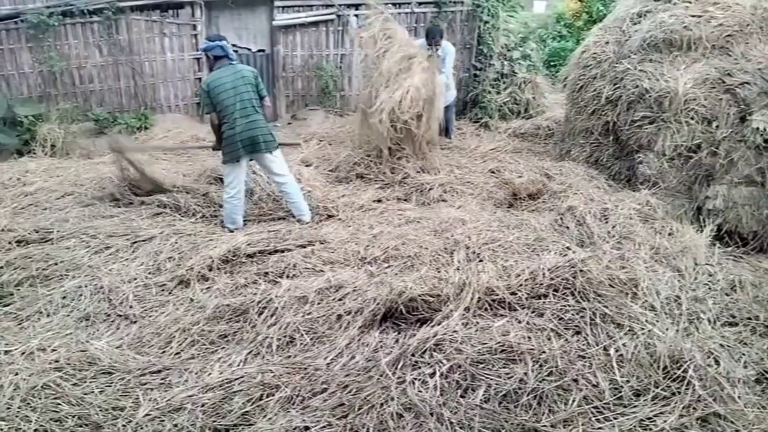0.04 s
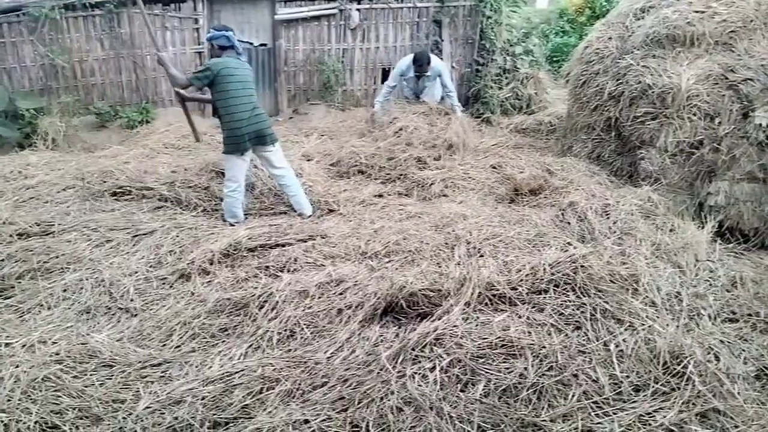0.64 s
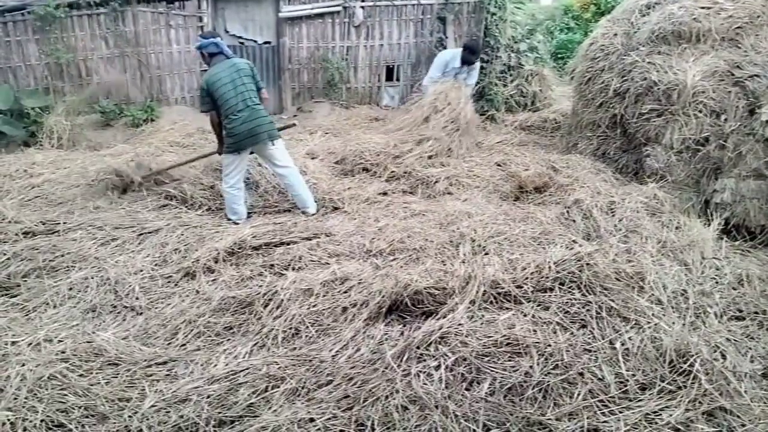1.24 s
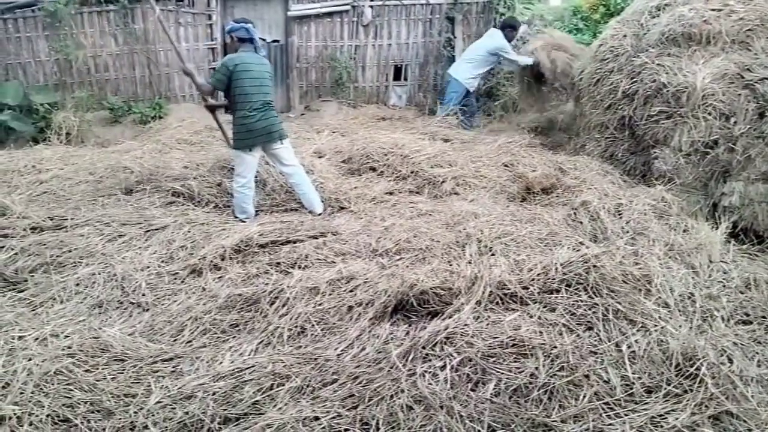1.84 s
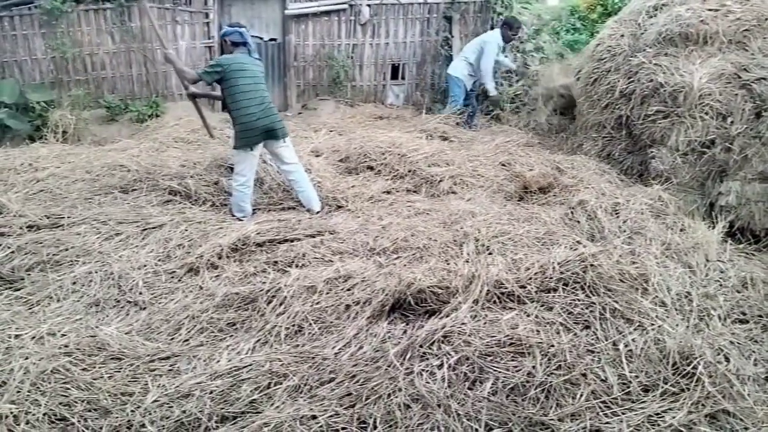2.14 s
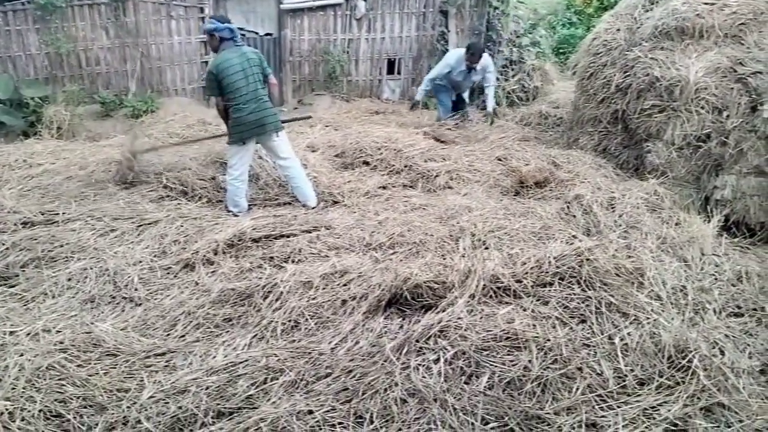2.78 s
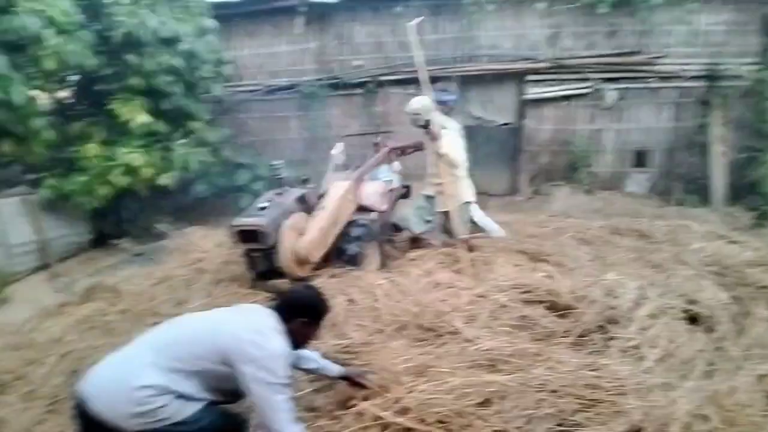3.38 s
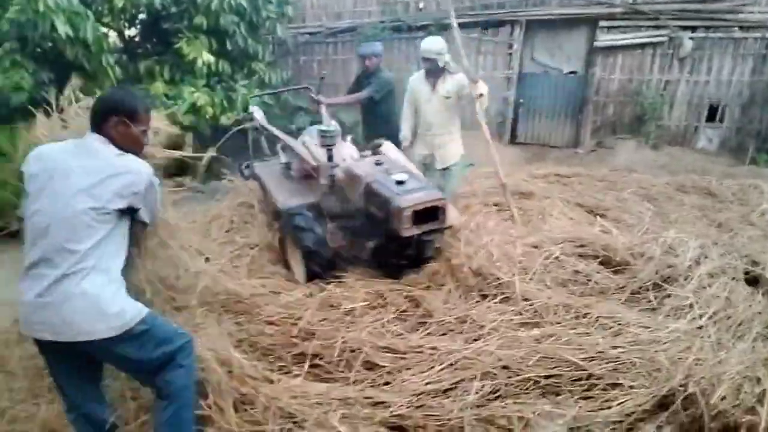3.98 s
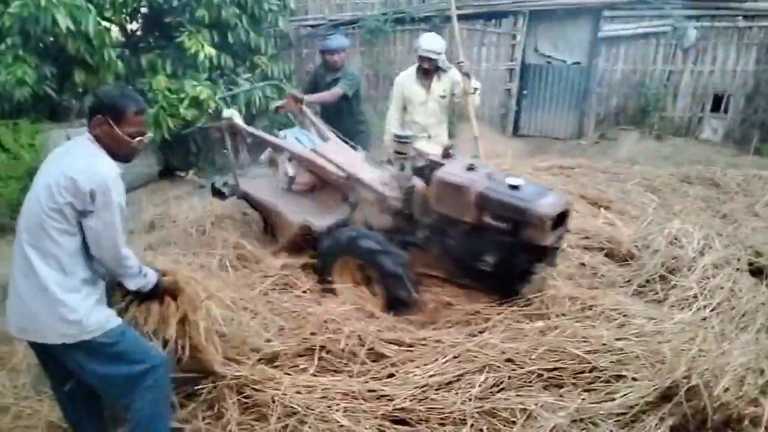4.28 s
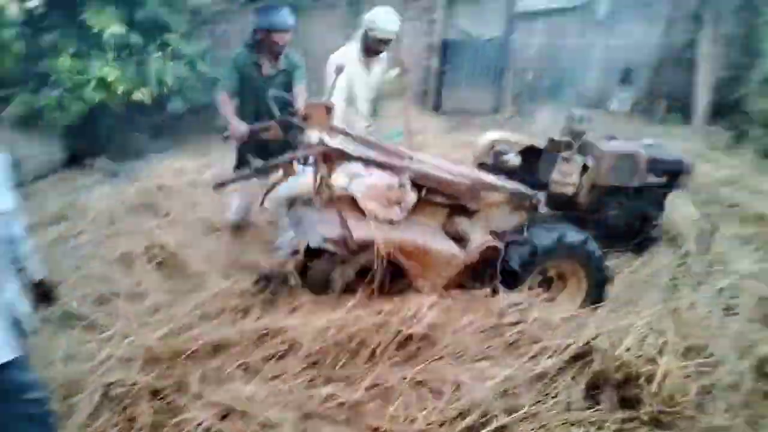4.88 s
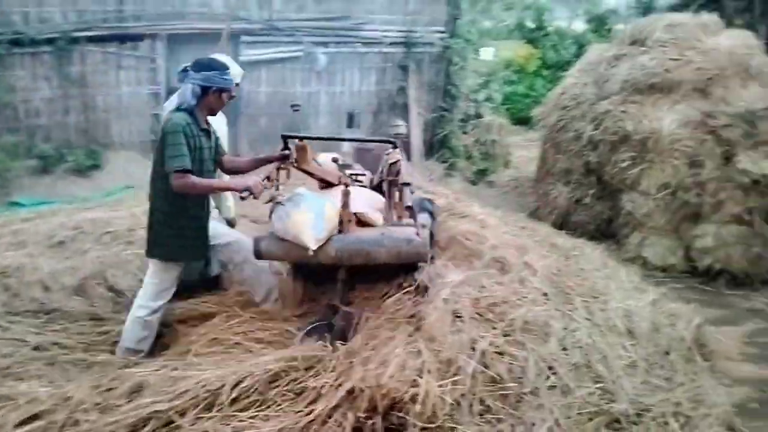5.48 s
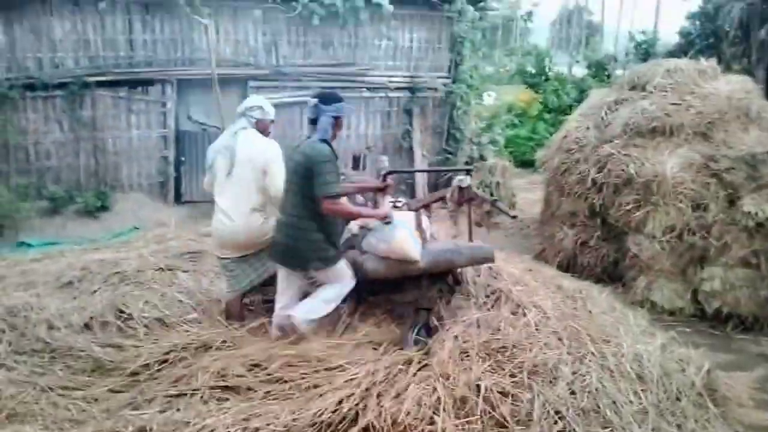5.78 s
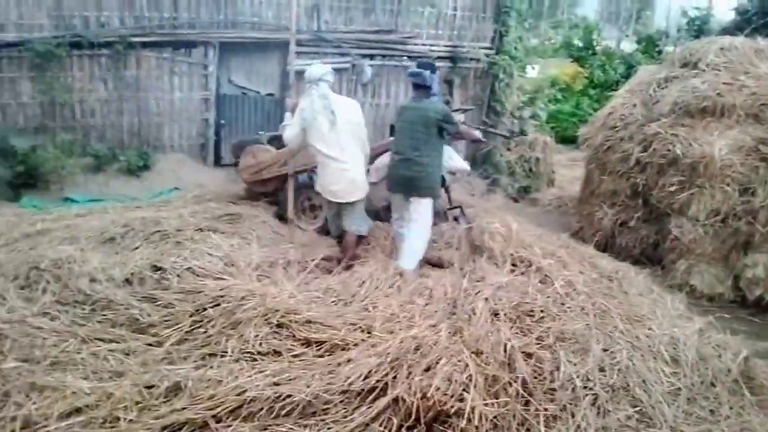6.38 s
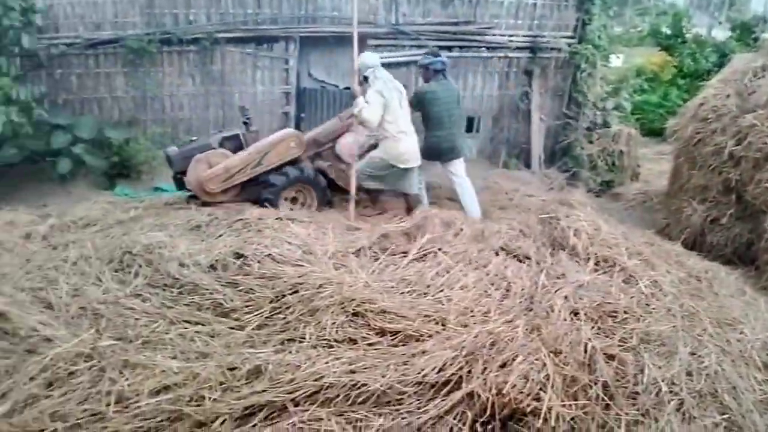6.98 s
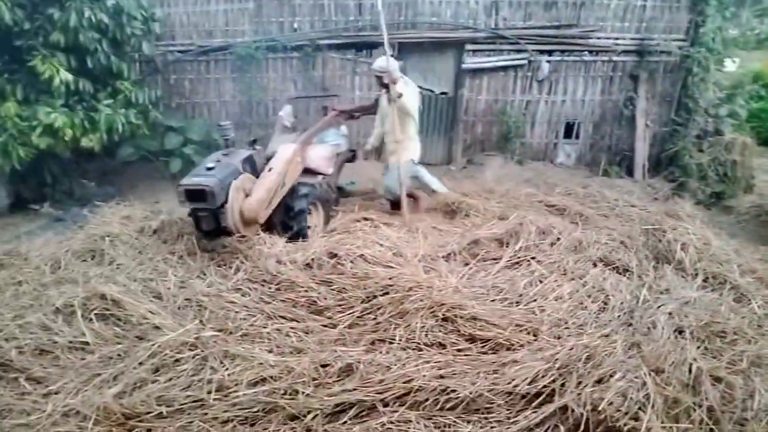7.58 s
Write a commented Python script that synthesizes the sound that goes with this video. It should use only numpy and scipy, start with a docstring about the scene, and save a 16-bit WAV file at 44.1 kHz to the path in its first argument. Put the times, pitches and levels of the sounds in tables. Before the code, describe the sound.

Soft crunching knocks and rustling straw, a few microphone bumps, a brief silence, then a small two-wheel diesel tractor chugs and rattles under load.

```python
"""A single-cylinder diesel walking tractor drives past over rice straw: its exhaust thumps about twenty
times a second through the silencer, under the clatter of its block, sheet-metal covers and loose parts.
It cuts in after a moment of silence. Before that, in a quiet village yard, a pole beats the straw with
a crunch and a thud, fingers bump and rub the phone, stalks rustle and a faint whine wavers far off."""
import sys
import numpy as np
from scipy import signal
from scipy.fft import rfft, irfft, next_fast_len
from scipy.io import wavfile
from scipy.ndimage import map_coordinates

SR = 44100
rng = np.random.default_rng(int(sys.argv[2]) if len(sys.argv) > 2 else 0)


def wav_record(signal):
    """Record a signal, one row per channel, as 16-bit PCM in the file named by sys.argv[1]."""
    frames = np.transpose(np.atleast_2d(signal))
    bounded = np.clip(frames, -1, 1)
    # unit amplitude maps onto the largest positive 16-bit level
    quanta = np.round(bounded * 32767).astype(np.int16)
    wavfile.write(sys.argv[1], SR, quanta)


N = 341334

# engine tempo: (time [s], firing rate [Hz])
FIRING_RATE = [(3.85, 20.3), (4.13, 20.2), (4.41, 20.7), (4.68, 19.8), (4.96, 19.7), (5.24, 20.2),
               (5.8, 20.3), (6.07, 20.5), (6.35, 20.9), (6.63, 20.8), (6.91, 21.5), (7.18, 21.7),
               (7.46, 22.1), (7.74, 21.5)]
# how hard the engine pulls: (time [s], exhaust level [dB])
ENGINE_LOAD = [(3.87, -23.5), (4.35, -25), (5.0, -27), (5.7, -25), (6.05, -22.5), (6.8, -25), (7.74, -23.5)]
# the hardest firings: (time [s], accent [dB])
ACCENTS = [(4.03, 3.5), (6.52, 3.5), (6.74, 5), (6.97, 5), (7.25, 4.5)]
# the drive-by, heading 0 head-on and 180 tail-on:
# (time [s], distance [m], heading [deg], left lag [s], covers' pan to the left [dB])
DRIVE_BY = [(3.85, 4.84, 5, -.00004, -2.5), (4.3, 3.8, 49, .00003, -2), (4.75, 3.65, 44, .00015, -3),
            (5.15, 3.4, 146, .00012, -2.5), (5.9, 4.55, 150, -.00003, -5), (6.6, 4.48, 113, -.00008, -4.5),
            (7.1, 4.2, 127, -.0001, -3.5), (7.74, 4.33, 65, -.00012, -6.5)]
# resonances of the tractor's bodies: (frequency [Hz], bandwidth [Hz], relative level [dB])
SILENCER_MODES = [(59.6, 54, -6), (97, 25.8, 2.5), (120.3, 30.4, -3.5), (230, 69, -10)]
BLOCK_FRONT_MODES = [(218, 51, -13.5), (367, 35, -6), (444, 44, 1.5), (584, 180, -7.5)]
BLOCK_REAR_MODES = [(240, 73, -9.5), (345.5, 29, -4), (407.4, 21.8, 2), (477, 56, -5), (590, 50, -5.5)]
COVER_MODES = [(690, 124, -9.5), (868, 69, 1.5), (1085, 250, -5.5), (1200, 117, -2.5)]
# chassis clanks that lift the rattle and hiss: (time [s], relative strength [dB])
CHASSIS_CLANKS = [(3.874, -7), (4.0228, -5.5), (4.1071, -7), (4.453, -16), (4.667, -7), (5.3476, -6),
                  (5.5563, -10), (5.8636, -6), (6.056, -7), (6.733, -6.5)]
# mix at REFERENCE_M: (base level [dB], front boost [dB], side boost [dB], dip behind the drivers [dB])
BLOCK_MIX = (-23, 4.5, -0.5, 1)
COVERS_MIX = (-17, -1, 2, 2.5)
RATTLE_MIX = (-22, 2.5, -0.5, 5)
HISS_MIX = (-23.5, -0.5, 0, 3)
# pole hits on the straw: (time [s], relative crunch [dB], relative thud [dB])
POLE_HITS = [(-.05, -21.5, -26), (1.278, -25.5, -23), (2.715, -25, -25.5)]
# finger bumps: (time [s], level [dB], pitch [Hz], decay [cycles], click [dB], left trim [dB])
FINGER_BUMPS = [(0.317, -35, 215, 16, -63, -3), (3.328, -24.5, 122, 4.1, -59, -32),
                (3.412, -23, 134, 4, -56, -33), (3.53, -23, 69.6, 4.8, -25, -34)]
# armfuls of straw gathered or thrown: (peak time [s], half length [s], level [dB])
STRAW_ARMFULS = [(0.556, 0.31, -48), (1.733, 0.31, -47.5)]
# armfuls landing softly: (time [s], level [dB])
STRAW_LANDINGS = [(.4, -64), (1.62, -52.5)]
# glide of the far whine: (time [s], pitch [Hz])
WHINE_PITCH = [(0, 974), (.55, 834), (1.0, 795), (1.2, 933), (1.5, 933), (1.95, 840), (2.4, 986),
               (2.9, 845), (3.3, 970)]
# tone colour of each noise layer: (frequency [Hz], relative level [dB])
RATTLE_EQ = [(900, -32), (1400, 1.5), (1800, -2), (2250, 2), (2900, -4.5), (3500, -3.5), (4100, -14.5),
             (6000, -41)]
HISS_EQ = [(2800, -9.5), (4100, -3.5), (5300, 0), (6600, -5.5), (7500, -14), (8700, -18), (11000, -11),
           (13500, -17.5), (16000, -23)]
CRUNCH_EQ = [(88, -20), (150, -11), (303, -5.5), (465, -17.5), (850, -8.5), (1380, -16), (2340, -6.5),
             (2680, -14.5), (3330, -11.5), (9530, -23.5), (13000, -20.5), (15800, -18.5)]
RUB_EQ = [(700, -30), (1000, -6), (1200, -12), (1450, 0), (1700, -13), (2200, -7), (4000, -32)]
STRAW_EQ = [(710, -10), (1200, -3.5), (1830, -4), (2130, -1.5), (2320, -4.5), (2940, -3.5), (6120, -7),
            (8460, -11.5), (15000, -7), (15800, -15)]
AIR_EQ = [(15, -36), (25, -15), (64, 1), (91, -9), (189, 0), (248, -7.5), (278, -3), (505, -11), (818, -8),
          (2500, -13.5), (3250, -30), (5500, -120)]
SWISH_EQ = [(1200, -14), (1900, -17), (2250, -2), (2700, -17.5), (5000, -34.5)]
GROUND_EQ = [(20, -22), (55, 3), (140, -8), (300, -10.5), (600, -14.5), (1500, -31)]
CLICK_EQ = [(100, 6), (500, 0), (1200, -1), (1800, -33), (8000, -36)]
LANDING_EQ = [(150, -40), (420, -2.5), (700, 1), (1100, -6), (4000, -39)]
# how alike the phone's two ports sound: (frequency [Hz], correlation [0-1])
TRACTOR_LIKENESS = [(100, .99), (400, 1), (620, 0.7), (850, 0.94), (1250, 0.57), (1750, 0.37), (2150, 0.91),
                    (3000, 0.35), (10000, 0.023)]
YARD_LIKENESS = [(100, 0.8), (700, 0.47), (2000, 0.049), (8000, 0.041)]
# shading by the phone's body: (frequency [Hz], left minus right [dB])
TRACTOR_PAN = [(250, 0), (450, -0.5), (620, 0.5), (1500, -1), (2200, 2.5), (3800, 0.5), (5300, -8),
               (6400, -15), (7300, -22), (8800, 0.5), (11000, 0.5), (13500, 5), (16000, 11)]
YARD_PAN = [(200, -2), (600, -4), (1200, -9), (2500, -0.5), (6000, 5), (12000, 8.5)]
# the tractor's phase between the ports: (frequency [Hz], left lead [rad])
TRACTOR_PHASE = [(500, 0), (900, .2), (1290, 1.2), (1640, 2.7), (1850, 5), (2200, 6.2)]

PAUSE_START_S, PAUSE_END_S, FIRST_FIRING_S = 3.583, 3.843, 3.869
REFERENCE_M = 4
SCREEN_S, SCREEN_WIDTH_S = 6.264, 0.23  # the two drivers walk between the engine and the phone
GRIP_START_S, GRIP_END_S, GRIP_LEFT_DB = 3.15, 3.435, -34
LEFT_RIGHT = np.array([[.5], [-.5]])  # splits a difference between the channels


def tractor():
    """The drive-by: exhaust thumps, while gear and valve impacts ring the block, covers and loose parts."""
    load_db, = curves(ENGINE_LOAD)
    distance, degrees, lag, pan_db = curves(DRIVE_BY)
    heading = np.radians(degrees)
    gain = lambda mix: pass_gain(mix, distance, heading)
    pulses, age = firings(load_db)
    jolts = wobble(70)  # the whole frame shakes unevenly
    knocking = engine_block(age, jolts, heading)
    rattle, hiss = loose_parts(age, jolts, heading)
    sound = amp(load_db) * exhaust(pulses, age) + gain(BLOCK_MIX) * knocking
    sound += gain(COVERS_MIX) * amp(pan_db * LEFT_RIGHT) * covers(age, jolts)
    sound += gain(RATTLE_MIX) * rattle + gain(HISS_MIX) * hiss
    delayed = np.arange(N) - LEFT_RIGHT * lag * SR  # the lag follows the tractor's bearing
    return np.array([map_coordinates(side, [at], order=5) for side, at in zip(sound, delayed)])


def firings(load_db):
    """One impulse per firing, more uneven under load, and the seconds since the last one."""
    rate, = curves(FIRING_RATE)
    cycles = np.cumsum(rate) / SR
    cycles += .025 * wobble(14) - cycles[round(FIRST_FIRING_S * SR)]
    at = np.flatnonzero(np.diff(np.floor(cycles)))
    spread_db = 1 + .2 * (load_db[at] - load_db.mean())
    size_db = spread_db * rng.uniform(-np.sqrt(3), np.sqrt(3), N)[at]
    for s, db in ACCENTS:
        size_db[np.argmin(np.abs(at / SR - s))] = db
    pulses = np.zeros(N)
    pulses[at] = amp(size_db)
    return pulses, cycles % 1 / rate


def exhaust(pulses, age):
    """The thump: each firing pushes a slug of gas and a turbulent puff through the silencer."""
    puff = unit(rng.standard_normal((2, N)) * (np.exp(-age / .011) + .3))
    slug = unit(np.roll(pulses, round(.003 * SR))) * np.array([[1], [0]])  # mid only, no side
    return tractor_image(ringing(slug + .9 * puff, SILENCER_MODES, low_hz=23, high_hz=305))


def engine_block(age, jolts, heading):
    """Knocks ring the block; its front and rear tones crossfade as the tractor turns."""
    drive = surge(age, depth=0.13, peak_s=0.021) * amp(0.26 * jolts)
    knocks = lambda: grains(rate=900, spread_db=3.5, noise=0.64) * drive
    front = ringing(knocks(), BLOCK_FRONT_MODES, low_hz=180, high_hz=730)
    rear = ringing(knocks(), BLOCK_REAR_MODES, low_hz=192, high_hz=800)
    return tractor_image(np.cos(heading / 2) * front + np.sin(heading / 2) * rear)


def covers(age, jolts, shift_db=0.73):
    """Taps ring the sheet metal; the ring shifts from panel to panel as the tractor rocks."""
    drive = surge(age, depth=0.089, peak_s=0.015) * amp(0.91 * jolts)
    taps = lambda: grains(rate=1100, spread_db=0.5, noise=0.52) * drive
    shares = [amp(db + shift_db * wobble(6)) * np.sqrt(width) for _, width, db in COVER_MODES]
    rings = [ringing(taps(), [(hz, width, 0)], low_hz=620, high_hz=1360) for hz, width, _ in COVER_MODES]
    blend = sum(share * ring for share, ring in zip(shares, rings))
    return tractor_image(blend / np.linalg.norm(shares, axis=0))


def loose_parts(age, jolts, heading):
    """The top end: small parts rattle, valves and belt hiss, and both flare at each chassis clank."""
    clanks = sum(amp(db + 10) * burst(s - .003, rise=0.0094, t60=0.027) for s, db in CHASSIS_CLANKS)
    flicker = unit(belt_slap(heading) * amp(jolts + 0.91 * wobble(260)))
    shaking = surge(age, depth=0.13, peak_s=0.0021) * flicker * np.sqrt(1 + clanks ** 2)
    rattle = coloured(grains(rate=2000, spread_db=-0.5, noise=0.9), RATTLE_EQ) * shaking
    hiss = coloured(grains(rate=3000, spread_db=3.0, noise=1.03), HISS_EQ) * shaking
    return tractor_image(rattle), tractor_image(hiss)


def belt_slap(heading, turns_per_firing=1.8, depth_db=1.5):
    """The drive belt pulses the clatter once a turn, deepest from the front."""
    rate, = curves(FIRING_RATE)
    turns = turns_per_firing * np.cumsum(rate) / SR
    return amp(depth_db * np.cos(heading / 2) ** 2 * np.cos(2 * np.pi * turns))


def surge(age, depth, peak_s):
    """Each firing shakes the engine harder for a moment."""
    return unit(1 + depth * (age / peak_s) * np.exp(1 - age / peak_s))


def pass_gain(mix, distance, heading):
    """A part's level falls with distance, depends on the side it shows and dips behind the drivers."""
    db, front_db, side_db, screen_db = mix
    facing_db = front_db * np.cos(heading / 2) ** 2 + side_db * np.sin(heading) ** 2
    return amp(db + facing_db - screen_db * swell(SCREEN_S, SCREEN_WIDTH_S)) * REFERENCE_M / distance


def pole_hits():
    """The pole swishes through the air, crushes dry stalks and thuds into the packed layer below."""
    stalks = coloured(yard_image(grains(rate=3500, spread_db=3.5, noise=1.0)), CRUNCH_EQ)
    swish = yard_noise(SWISH_EQ)
    ground = coloured(rng.standard_normal(N), GROUND_EQ)
    out = np.zeros((2, N))
    for s, crunch_db, thud_db in POLE_HITS:
        crush = burst(s - .004, rise=.018, t60=.18) + .08 * burst(s - .03, rise=.05, t60=.5)
        low_tone = np.sin(2 * np.pi * 100 * (clock() - s - .028))
        out += amp(crunch_db - 33.5) * swish * swell(s - .017, width=0.12)
        out += amp(crunch_db) * stalks * crush
        out += amp(thud_db - 0.5) * low_tone * burst(s + 0.032, rise=0.00526, t60=0.083)
        out += amp(thud_db - 6.5) * ground * burst(s + 0.0071, rise=0.015, t60=0.26)
    return out


def finger_bumps():
    """Each touch gives the phone a short low swing and a dull click, mostly on the right."""
    click = coloured(rng.standard_normal(N), CLICK_EQ)
    out = np.zeros((2, N))
    for s, db, hz, cycles, click_db, left_db in FINGER_BUMPS + grip_slips(count=11):
        decay = cycles / hz
        swing = -amp(db) * burst(s, rise=decay / 8, t60=decay) * np.sin(2 * np.pi * hz * (clock() - s))
        tick = amp(click_db) * click * burst(s, rise=0.00055, t60=0.018)
        out += (swing + tick) * amp([[left_db], [0]])
    return out


def grip_slips(count, cycles=3.8, click_db=-18):
    """The grip shifts in small uneven slips, growing firmer and lower; rows as in FINGER_BUMPS."""
    timing, force, tuning = rng.standard_normal((count, 3)).T
    elapsed = np.linspace(0, GRIP_END_S - GRIP_START_S, count) + 0.0048 * timing
    levels_db = -32 + 26 * elapsed + force
    pitches_hz = (142 - 230 * elapsed) * np.exp(0.16 * tuning)
    return [(GRIP_START_S + s, db, hz, cycles, db + click_db, GRIP_LEFT_DB)
            for s, db, hz in zip(elapsed, levels_db, pitches_hz)]


def finger_rub():
    """Skin slides faintly over the case beside the right port while the grip shifts."""
    friction = coloured(rng.standard_normal(N), RUB_EQ)
    return amp(-54) * swell(3.42, width=0.22) * friction * amp([[GRIP_LEFT_DB], [0]])


def loose_straw(underfoot_db=-53.5, stir_db=-49.5):
    """Straw rustles underfoot, swells around each hit and armful, and lands softly when tossed."""
    stirs = [amp(stir_db) * swell(s, width=0.26) for s, _, _ in POLE_HITS]
    armfuls = [amp(db) * swell(s, width) for s, width, db in STRAW_ARMFULS]
    handling = np.sqrt(amp(underfoot_db) ** 2 + np.sum(np.square(stirs + armfuls), axis=0))
    drift = amp(0.4 * wobble(10))
    rustle = coloured(yard_image(grains(rate=2500, spread_db=1, noise=1.7)), STRAW_EQ)
    landings = sum(amp(db) * burst(s, rise=0.028, t60=1.4) for s, db in STRAW_LANDINGS)
    return handling * drift * rustle + landings * yard_noise(LANDING_EQ)


def far_whine(fade_db_per_s=2):
    """A thin, rough far tone that wavers in pitch and slowly fades."""
    hz, = curves(WHINE_PITCH)
    flutter = unit((wobble(120) + 1j * wobble(120) + .4) * amp(2 * wobble(12)))
    tone = np.real(flutter * np.exp(2j * np.pi * np.cumsum(hz) / SR))
    return amp(-56.5 - fade_db_per_s * clock()) * tone * amp([[-3], [2]])


def open_air(level_db=-55, drift_db=0.5):
    """The bed: soft, dark outdoor air that drifts in level."""
    return amp(level_db + drift_db * wobble(6.67)) * yard_noise(AIR_EQ)


def tractor_image(pair):
    """The tractor's stereo image: each port has its own shade and phase."""
    wide = stereo(pair, TRACTOR_LIKENESS)
    turned = filtered(wide, lambda hz: np.exp(1j * LEFT_RIGHT * along(TRACTOR_PHASE, hz)))
    return shaded(turned, TRACTOR_PAN)


def yard_image(pair):
    """The wide stereo image of sounds from across the yard."""
    return shaded(stereo(pair, YARD_LIKENESS), YARD_PAN)


def yard_noise(eq):
    """Coloured noise spread across the yard."""
    return coloured(yard_image(rng.standard_normal((2, N))), eq)


def stereo(pair, likeness):
    """Two unrelated signals, as mid and side, mixed to a left and right of the given likeness."""
    angle = lambda hz: np.arccos(np.clip(along(likeness, hz), -1, 1)) / 2
    mid, side = filtered(pair, lambda hz: np.array([np.cos(angle(hz)), np.sin(angle(hz))]))
    return unit(np.array([mid + side, mid - side]))


def shaded(pair, pan):
    """The phone's body shades the two ports differently at each frequency."""
    return filtered(pair, lambda hz: amp(LEFT_RIGHT * along(pan, hz)))


def grains(rate, spread_db, noise):
    """Two trains of tiny random impacts, rate a second, on a share of even noise."""
    hits = rng.random((2, N)) < rate / SR
    sizes = rng.choice([-1, 1], (2, N)) * amp(spread_db * rng.standard_normal((2, N)))
    return unit(unit(hits * sizes) + noise * rng.standard_normal((2, N)))


def ringing(x, modes, low_hz, high_hz):
    """x through a body's resonances, which radiate between two edges, at rms 1."""
    body = lambda f: sum((-1) ** k * amp(db) * 1j * f * width / (hz * hz - f * f + 1j * f * width)
                         for k, (hz, width, db) in enumerate(modes))
    band = signal.butter(2, [low_hz, high_hz], "bandpass", fs=SR, output="sos")
    return unit(signal.sosfilt(band, filtered(x, body)))


def coloured(x, eq):
    """x through an EQ curve, at rms 1."""
    return unit(filtered(x, lambda hz: amp(along(eq, hz))))


def filtered(x, response):
    """x times a complex response of frequency."""
    size = next_fast_len(N + SR // 2)
    return irfft(rfft(x, size) * response(np.fft.rfftfreq(size, 1 / SR)), size)[..., :N]


def burst(s, rise, t60):
    """An envelope of peak 1 that swells from time s and dies away."""
    shape = lambda t: (1 - np.exp(-(t / rise) ** 2)) * amp(-60 * t / t60)
    return shape(np.maximum(clock() - s, 0)) / np.max(shape(np.linspace(0, t60, 500)))


def swell(s, width):
    """A bell-shaped envelope of peak 1 around time s."""
    return np.exp(-((clock() - s) / width) ** 2)


def wobble(rate):
    """A smooth random curve, rate knots a second."""
    return map_coordinates(rng.standard_normal(int(N * rate / SR) + 4), [clock() * rate])


def curves(rows):
    """An automation curve for each column after the time."""
    times, *columns = np.transpose(rows)
    return [np.interp(clock(), times, column) for column in columns]


def along(points, hz):
    """(frequency, value) points read on a log axis."""
    knots, values = np.transpose(points)
    return np.interp(np.log(hz + 1), np.log(knots + 1), values)


def clock():
    """The time of every sample."""
    return np.arange(N) / SR


def amp(db):
    """Decibels to gain."""
    return 10 ** (np.asarray(db) / 20)


def unit(x):
    """Scaled to rms 1."""
    return x / np.sqrt(np.mean(np.abs(x) ** 2) + 1e-20)


def scene():
    """The hand work, a silent pause, then the tractor."""
    fade_out = np.clip((PAUSE_START_S - clock()) / .002, 0, 1)
    fade_in = np.clip((clock() - PAUSE_END_S) / .003, 0, 1)
    yard = open_air() + loose_straw() + far_whine() + pole_hits() + finger_bumps() + finger_rub()
    return fade_out * yard + fade_in * tractor()


def record(dry, top_hz=15950):
    """A soft clip rounds the highest peaks, then a steep high cut trims the top."""
    rounded = dry / (1 + np.abs(dry) ** 8) ** (1 / 8)
    return filtered(rounded, lambda hz: np.clip((top_hz - hz) / 100 + .5, 0, 1))


dry = scene()
out = record(dry)
wav_record(out)
```